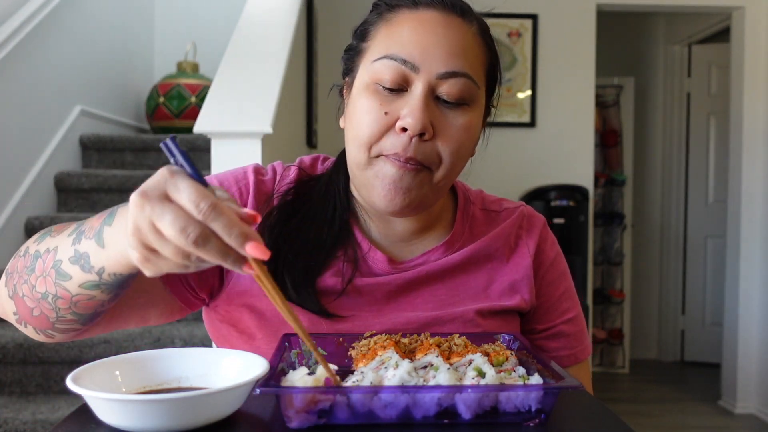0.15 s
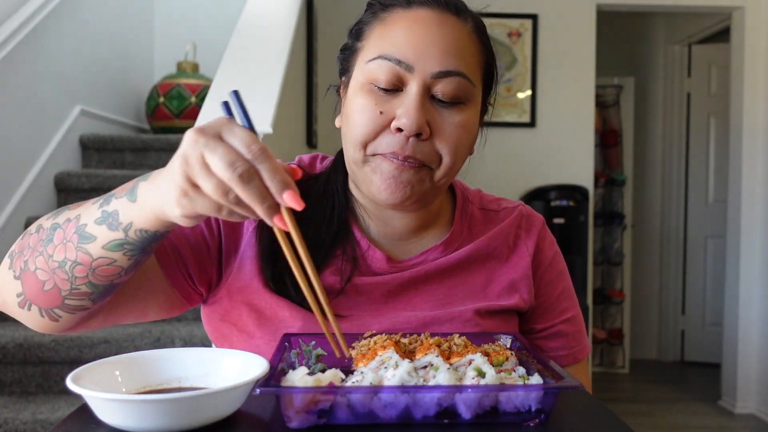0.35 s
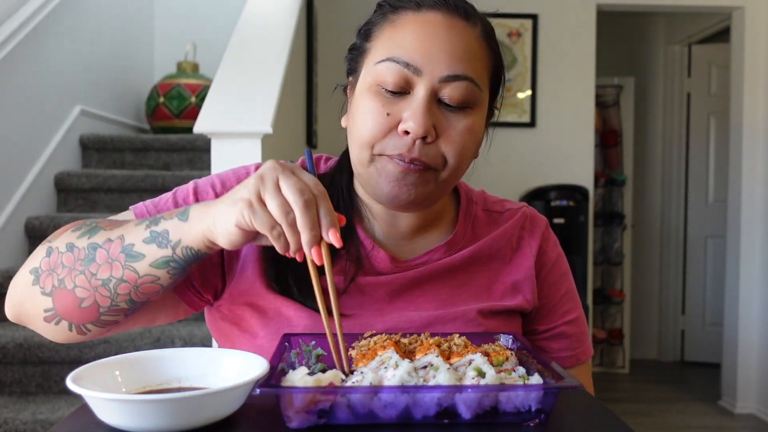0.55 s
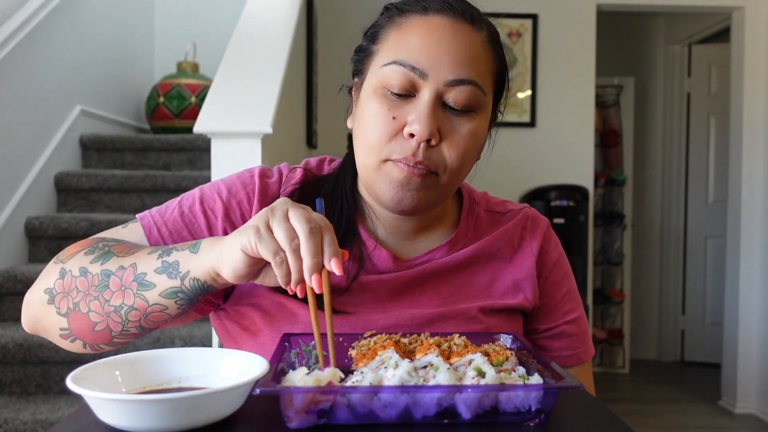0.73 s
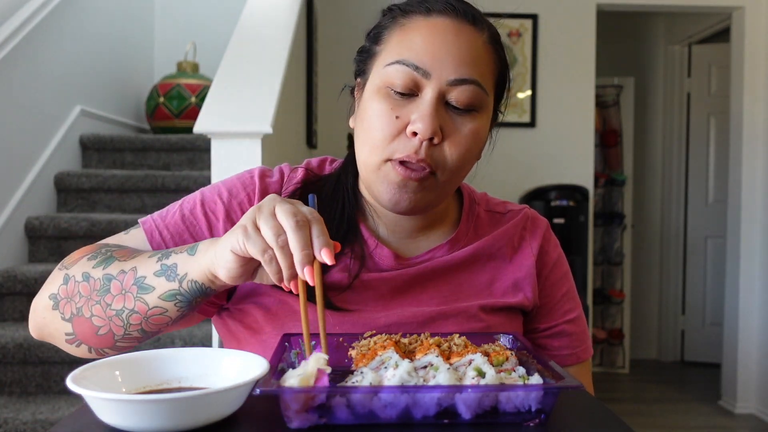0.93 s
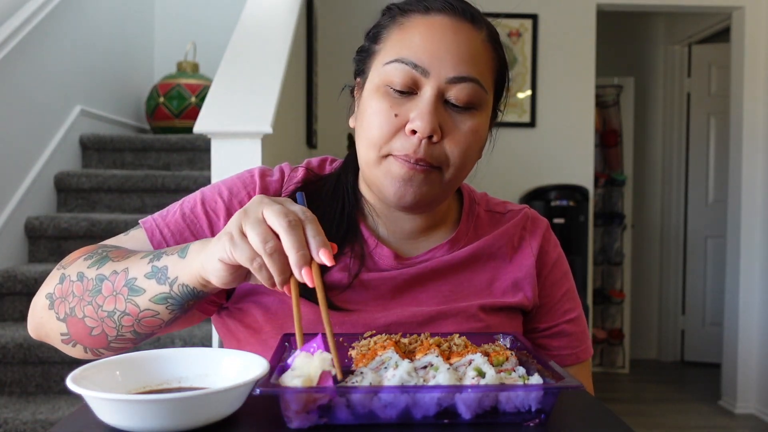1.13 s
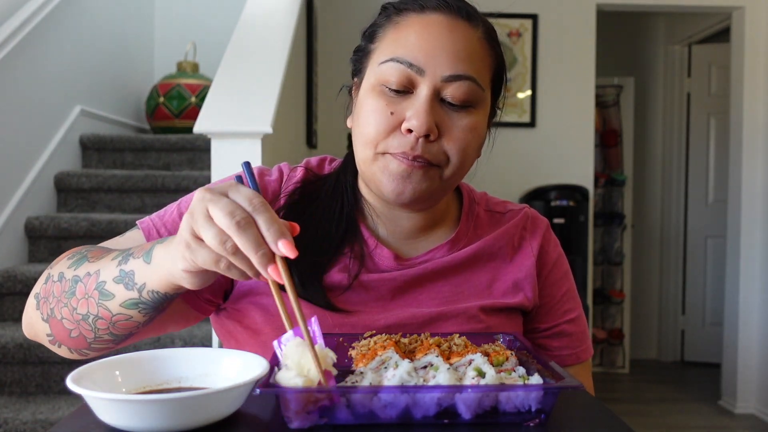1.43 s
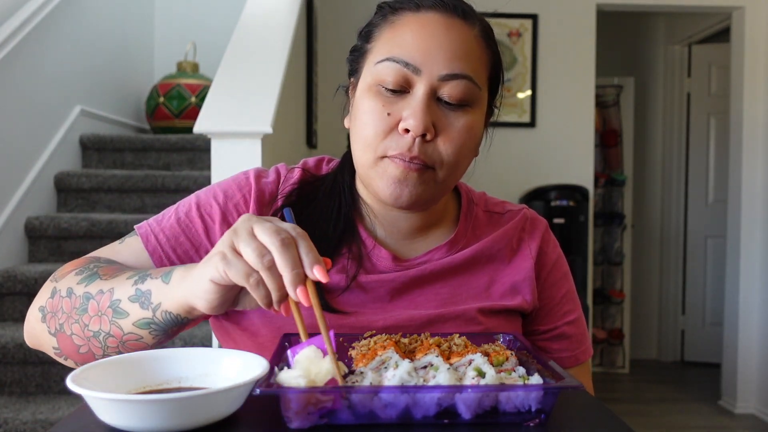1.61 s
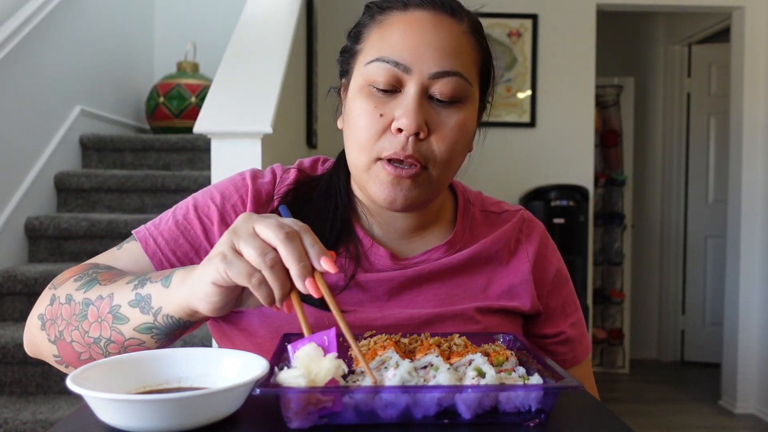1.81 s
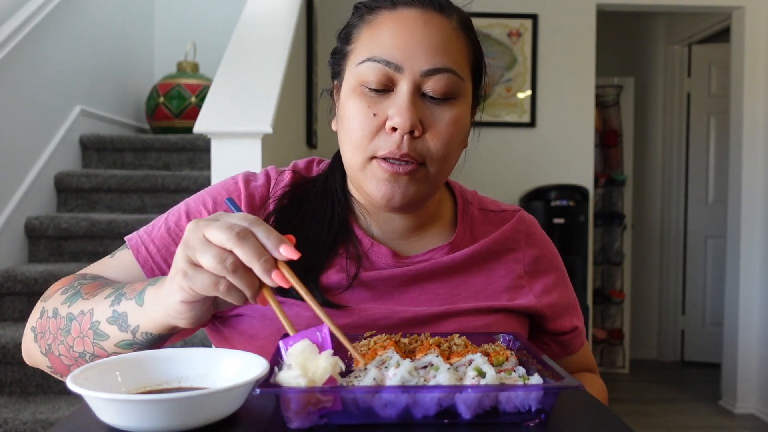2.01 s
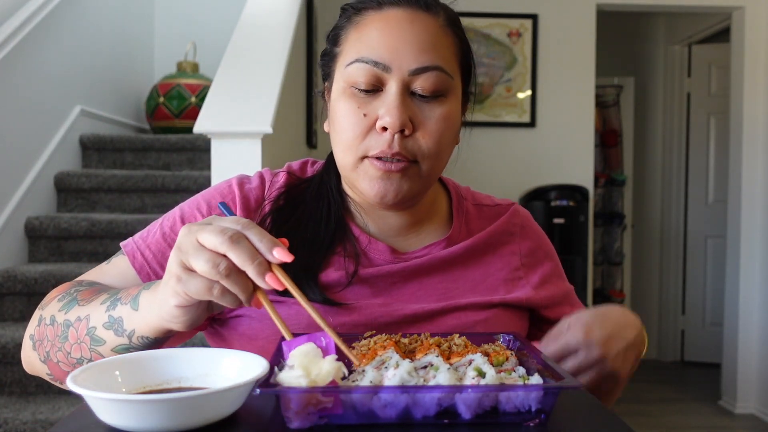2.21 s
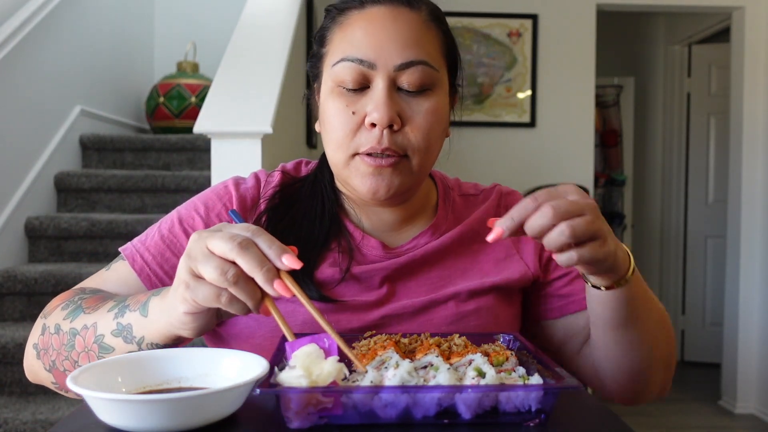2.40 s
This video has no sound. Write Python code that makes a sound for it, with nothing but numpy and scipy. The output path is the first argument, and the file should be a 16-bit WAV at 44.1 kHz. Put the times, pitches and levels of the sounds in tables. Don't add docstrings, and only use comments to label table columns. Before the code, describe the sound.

Chopsticks scraping and tapping a plastic takeout tray, with light rubbing against a bowl

```python
import sys
import numpy as np
from scipy import signal
from scipy.fft import rfft, irfft, next_fast_len
from scipy.io import wavfile
from scipy.ndimage import uniform_filter1d, map_coordinates

SR = 44100
rng = np.random.default_rng(int(sys.argv[2]) if len(sys.argv) > 2 else 0)


def pcm_store(signal):
    levels = np.round(np.clip(np.atleast_2d(signal), -1, 1) * 32767)
    wavfile.write(sys.argv[1], SR, levels.astype(np.int16).T)


def invert_db(level):
    return 10 ** (np.asarray(level, dtype=float) / 20)


N = 112454

# (frequency [Hz], density [dB per Hz])
HUSH_SPECTRUM = [(25, -45), (60, -32), (95, -15.5), (200, -12), (240, -2.5), (290, -9), (540, 8.5),
                 (1420, 10.5), (5000, -1.5), (15700, -12.5)]
# (frequency [Hz], likeness [0-1])
HUSH_LIKENESS = [(60, 0.55), (200, 0.9), (700, 0.2), (3000, 0.067), (12000, 0.56)]
# (delay [s], left level [dB], right level [dB])
EARLY_ECHOES = [
    (.0073, -10, -11),
    (.0106, -13, -12),
    (.0175, -16, -18),
    (.0216, -18, -17),
]
# (frequency [Hz], T60 [s])
ROOM_T60 = [(250, 0.47), (1000, 0.52), (2500, 0.48), (4500, 0.47), (9000, 0.39), (15000, 0.27)]
# (frequency [Hz], likeness [0-1])
ROOM_LIKENESS = [(150, 0.63), (1000, 0.48), (3000, 0.67), (6000, 0.42), (9000, 0.52), (14000, 0.69)]
# (time [s], length [s], pitch [Hz], level [dB])
PANEL_SONGS = [(0.239, 0.011, 3750, -54), (0.331, 0.018, 3150, -43.5), (0.49, 0.022, 997, -48),
               (0.723, 0.015, 3900, -40), (0.789, 0.043, 1514, -46.5), (0.812, 0.073, 1160, -49.5),
               (1.079, .03, 1170, -55), (1.707, .018, 3000, -51), (1.715, .035, 3920, -56.5),
               (1.778, .035, 1454, -44.5), (1.9, .014, 1390, -50), (2.108, 0.023, 3100, -44.5),
               (2.147, 0.075, 5200, -48.5), (2.149, 0.032, 7100, -45)]
# (time [s], peak [dB], centre [Hz], spread [octaves], crack [dB])
STICK_TAPS = [(0.1512, -36.5, 2480, 0.19, -1), (0.157, -41, 2400, .5, -9.5), (0.19, -51, 5300, 1.2, 6.5),
              (0.2396, -35, 3940, 0.098, 1), (0.24, -40.5, 3750, 0.094, -5), (0.2446, -39, 3800, 0.17, -6),
              (0.2391, -36.5, 1900, 0.15, -23), (0.2464, -31.5, 3760, 0.1, 1), (0.246, -34, 1910, 0.24, -7),
              (.332, -33, 3500, 0.31, -5), (0.343, -39, 3100, .2, -13), (0.642, -29, 1670, 0.25, -13),
              (1.0422, -37.5, 1640, 0.22, -9), (1.057, -43, 2800, 0.34, -12),
              (1.067, -25.5, 1675, 0.13, -9.5), (1.0667, -42, 4440, 0.21, -13.5),
              (1.137, -46, 2080, .3, -10), (1.3232, -20, 4260, 0.84, -4), (1.5965, -44.5, 1830, 0.45, 0),
              (1.607, -41, 1830, 0.19, -14), (1.6274, -41.5, 2620, 0.88, -6.5),
              (1.68, -39, 4500, 0.28, -13), (1.707, -39, 5400, 0.28, -13), (1.738, -36, 6600, 0.27, -2),
              (1.858, -38, 6000, 0.26, -16), (1.8987, -35, 1450, 0.072, -23),
              (1.8973, -35, 2950, 0.16, -15), (1.915, -39.5, 2900, 0.27, -6),
              (1.924, -39, 2870, 0.44, -6.5), (2.0443, -40, 3100, 0.77, 0)]
STICK_MODES = [1420, 1630, 2010, 2530, 2950, 3500, 3900, 4500, 4900, 5400, 6000, 6600, 7900, 8340]
# (time [s], length [s], level [dB], table-contact bass [dB], treble [dB])
TRAY_STROKES = [(-.03, 0.043, -52.5, -3.5, 1), (.03, 0.07, -52, -1.5, -4.5),
                (0.149, 0.074, -52.5, -24, 2.5), (.228, 0.028, -45.5, -31, 1),
                (.315, 0.024, -43.5, -31, 0.5), (.331, 0.037, -44.5, -38, -6),
                (.372, 0.013, -37, -13, -2.5), (0.381, 0.091, -37.5, -3.5, 0.5),
                (.435, 0.017, -41.5, -2, -1), (.463, 0.028, -38, 3, 3.5), (.485, 0.091, -36, 2.5, 5.5),
                (0.574, .13, -39.5, 2, 1), (0.717, 0.026, -32, -6, -7), (.765, 0.02, -42, -2, 6.5),
                (.78, 0.019, -39, -13, 1), (.792, 0.022, -32.5, -4, 1.5), (1.068, 0.05, -49, 5, -25),
                (1.14, 0.04, -43.5, -2, -9.5), (1.16, 0.15, -45.5, -2.5, -6),
                (1.33, 0.073, -45, -3.5, -0.5), (1.397, 0.066, -51, 2.5, -5), (1.47, 0.023, -52.5, -3, 3.5),
                (1.593, 0.028, -48.5, -5, -13.5), (1.627, 0.1, -52.5, -1, -5)]
# (frequency [Hz], density [dB per Hz])
SHEET_SPECTRUM = [(41, -87), (70, -60.5), (458, -18.5), (513, -12.5), (826, -10.5), (990, 1.5), (3940, 2.5),
                  (13400, -14.5), (15700, -33.5)]
# (frequency [Hz], width [Hz], level over the sheet noise [dB])
TRAY_MODES = [(380, 98, 2), (525, 65, 3), (697, 130, 0.5), (976, 44, -6.5), (1174, 11, -36), (2340, 92, -6),
              (2990, 57, -17), (3200, 73, -10), (3930, 14, -7.5), (5320, 31, 3), (6940, 790, -7),
              (10150, 31, -7), (12900, 86, 2), (15500, 63, 21)]
# (time [s], length [s], level [dB], bass [dB], treble [dB])
RIM_RUBS = [(1.678, 0.029, -46, 3.5, -10), (1.70, 0.068, -46, 6.5, 7.5), (1.725, 0.026, -57, 7, -9),
            (1.765, 0.027, -46, -7, 10), (1.782, 0.043, -38.5, 1.5, -8.5), (1.82, 0.044, -45.5, 1, 3),
            (1.90, 0.037, -53, 8.5, -18), (2.032, 0.015, -44.5, -9, -3.5), (2.044, 0.057, -45, 6.5, 2),
            (2.103, 0.022, -38.5, 7, 4.5), (2.118, .03, -38.5, 7, 3.5), (2.14, 0.071, -43, 8, 9),
            (2.175, 0.039, -48.5, -3, 0), (2.3, 0.074, -55.5, 4.5, -16)]
# (frequency [Hz], density [dB per Hz])
RIM_SPECTRUM = [(41, -84), (70, -57), (374, -34), (513, -10.5), (864, -13.5), (1010, -5), (1420, 2),
                (7100, -9), (15700, -30)]
# (frequency [Hz], width [Hz], level over the rim noise [dB])
BOWL_MODES = [(520, 19, 3), (706, 140, -2.5), (983, 38, 7), (1400, 26, -9), (1923, 42, -7.5),
              (3100, 1800, -3.5), (5100, 95, 1.5), (7200, 87, 4), (8850, 120, 5.5), (10520, 160, 6),
              (11170, 160, 12.5), (13300, 220, 11.5), (14400, 75, 10), (15150, 150, 5)]
# (frequency [Hz], level [dB])
BODY_SCATTER_SPECTRUM = [(1500, -20), (4000, -8), (8000, -3.5), (14000, -3.5)]
# (frequency [Hz], width [Hz], depth [dB])
PORT_NOTCHES = [(12200, 400, -4), (14550, 350, -9)]

TOP_HZ = 15800


def unit(x):
    return x / np.sqrt(np.mean(x ** 2) + 1e-20)


def along(points, hz):
    f, v = np.transpose(points)
    return np.interp(np.log(hz + 1), np.log(f + 1), v)


def filtered(x, response):
    size = next_fast_len(x.shape[-1] + 8192)
    spectrum = rfft(x, size) * response(np.fft.rfftfreq(size, 1 / SR))
    return irfft(spectrum, size)[..., :x.shape[-1]]


def pair(noises, likeness):
    def mid_side_gain(f):
        turn = np.arccos(np.clip(along(likeness, f), -1, 1)) / 2
        return np.array([np.cos(turn), np.sin(turn)])

    mid, side = filtered(noises, mid_side_gain)
    return np.array([mid + side, mid - side])


def hush():
    noise = pair(rng.standard_normal((2, N)), HUSH_LIKENESS)
    shaped = filtered(noise, lambda f: invert_db(along(HUSH_SPECTRUM, f)) * (f < TOP_HZ))
    return invert_db(-61.5) * unit(shaped)


def room(drag, tap):
    tail_db, onset_s = -3, 0.0095
    tap_tail_db = -3.5
    hz, t, z = signal.stft(rng.standard_normal((2, SR * 3 // 4)), SR, nperseg=256)
    decay = invert_db(-60 * t / along(ROOM_T60, hz)[:, None])
    tail = signal.istft(z * decay, SR, nperseg=256)[1]
    onset = np.clip(np.arange(tail.shape[1]) / SR / onset_s - .5, 0, 1)
    tail = pair(tail, ROOM_LIKENESS) * onset
    tail = tail * invert_db(tail_db) / np.linalg.norm(tail[0])

    walls = np.zeros((2, SR // 20))
    for delay, left_db, right_db in EARLY_ECHOES:
        walls[:, round(delay * SR)] = invert_db([left_db, right_db])

    late = signal.fftconvolve((drag + invert_db(tap_tail_db) * tap)[None], tail, axes=1)
    early = signal.fftconvolve((drag + tap)[None], walls, axes=1)
    return late[:, :N] + early[:, :N]


def panel_singing():
    out, t = np.zeros(N), np.arange(N) / SR
    half_width = .15 / 2
    for (start, length, hz, db), noise in zip(PANEL_SONGS, rng.standard_normal((len(PANEL_SONGS), N))):
        panel = unit(filtered(noise, lambda f: 1 / (1 + ((f - hz) / (half_width * hz)) ** 2)))
        swell = np.sqrt(np.abs(np.sin(np.pi * np.clip((t - start) / length, 0, 1))))
        out += invert_db(db) * panel * swell
    return out


def stick_ticks():
    rise_s, ring_t60_s, crack_t60_s = .0015, .009, .008
    crack_over_pitch = 1.7
    grip_detune = .02
    scatter_hz = 4360
    out, t = np.zeros(N + SR), np.arange(1500) / SR
    modes = np.array(STICK_MODES)[:, None]
    rise = np.sin(np.pi / 2 * np.clip(t / rise_s, 0, 1)) ** 2
    luck = rng.standard_normal((len(STICK_TAPS), 3, len(modes), 1))
    noises = rng.standard_normal((len(STICK_TAPS), len(t)))
    for (start, db, hz, octaves, crack_db), noise, (size, turn, grip) in zip(STICK_TAPS, noises, luck):
        top = crack_over_pitch * hz
        crack = unit(filtered(noise, lambda f: (f / top) / (1 + (f / top) ** 6)))
        crack = crack * invert_db(crack_db - 60 * t / crack_t60_s)

        weight = np.exp(-np.abs(np.log2(modes / hz)) / max(octaves, .1)) * invert_db(0.71 * size)
        pitch = modes * (1 + grip_detune * grip)
        phase = 2 * np.pi * pitch * (t - rise_s) + turn * modes / scatter_hz * 2
        ring = (weight * np.sin(phase)).sum(0) / np.linalg.norm(weight) / 2
        ring = ring * invert_db(-60 * t / ring_t60_s)
        out[round(start * SR):][:len(t)] += invert_db(db + 1.5) * rise * (4 * ring + 2 * crack)
    return out[:N]


def patchy(x):
    z = signal.stft(x, nperseg=256)[2]
    over_frequency = uniform_filter1d(rng.standard_normal(z.shape), 6, 0)
    field = uniform_filter1d(over_frequency, 8, 1)
    return signal.istft(z * invert_db(1.8 * unit(field)), nperseg=256)[1][:N]


def scrape(strokes, spectrum, modes):
    grit_per_s, grit_spread_db, smooth_share = 9000, 1.5, .66
    bass_hz, treble_hz = 1160, 6000
    attack_s, release_s, sag_db = 0.0044, 0.017, 5.5
    attack_share = 0.21
    waver_db, waver_hz = 0.5, 41.41

    def body(f):
        resonances = sum(invert_db(db) * 1j * f * w / (c * c - f * f + 1j * f * w) for c, w, db in modes)
        return invert_db(along(spectrum, f)) * (1 + resonances)

    grit = (rng.random(N) < grit_per_s / SR) * rng.standard_normal(N)
    grit = grit * invert_db(grit_spread_db * rng.standard_normal(N))
    friction = smooth_share * rng.standard_normal(N) + (1 - smooth_share) * unit(grit)
    rub = unit(filtered(patchy(friction), body))
    bass = filtered(rub, lambda f: 1 / (1 + (f / bass_hz) ** 10))
    treble = filtered(rub, lambda f: 1 - 1 / (1 + (f / treble_hz) ** 2))

    t, out = np.arange(N) / SR, np.zeros(N)
    for start, length, db, bass_db, treble_db in strokes:
        u = t - start
        attack = np.clip(u / (attack_s + attack_share * length), 0, 1)
        sag = -sag_db * np.clip(u / length, 0, 1)
        release = -20 * np.clip(u - length, 0, 1) / release_s
        tone = rub + (invert_db(bass_db) - 1) * bass + (invert_db(treble_db) - 1) * treble
        out += invert_db(db) * attack * invert_db(sag + release) * tone
    waver = map_coordinates(rng.standard_normal(1000), [t * waver_hz])
    return out * invert_db(waver_db * waver)


def scene():
    scrape_pan_db, tick_pan_db = -3.5, 1.8
    mic_low_hz, scatter_s = 950, .0011
    drag = scrape(TRAY_STROKES, SHEET_SPECTRUM, TRAY_MODES) + scrape(RIM_RUBS, RIM_SPECTRUM, BOWL_MODES)
    tap = filtered(stick_ticks(), lambda f: 1 - 1 / (1 + (f / mic_low_hz) ** 4))
    side = np.array([[.5], [-.5]])

    def body_scatter(f):
        return invert_db(along(BODY_SCATTER_SPECTRUM, f)) * np.exp(-2j * np.pi * f * scatter_s)

    near_drag = drag + panel_singing() + 2 * side * filtered(drag, body_scatter)
    return near_drag * invert_db(scrape_pan_db * side) + tap * invert_db(tick_pan_db * side) + room(drag, tap)


def low_pass(x):
    return signal.sosfilt(signal.butter(12, 15770, fs=SR, output="sos"), x)


def record(dry):
    def ports(f):
        notches = sum(db * np.exp(-((f - hz) / w) ** 2) for hz, w, db in PORT_NOTCHES)
        return invert_db(notches) * (f < TOP_HZ)

    return low_pass(filtered(dry, ports) + hush())


dry = scene()
out = record(dry)
pcm_store(out)
```